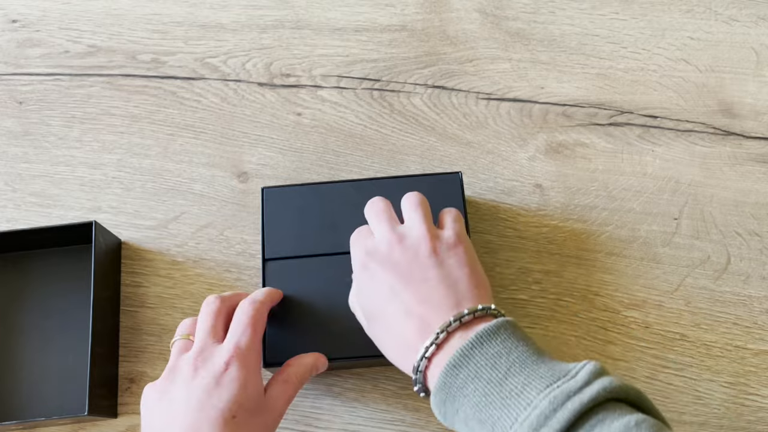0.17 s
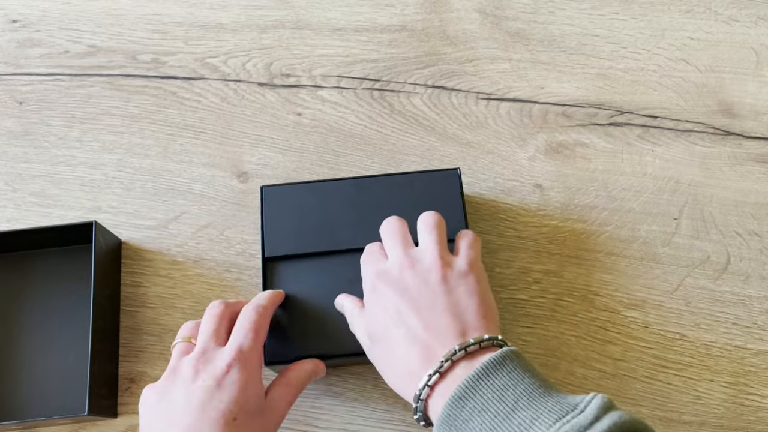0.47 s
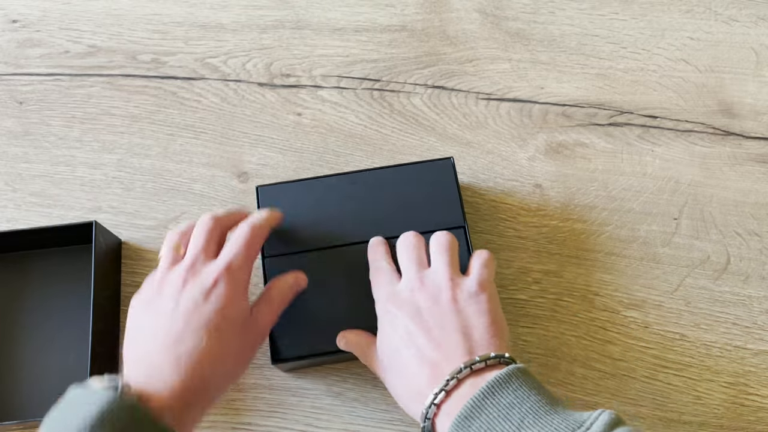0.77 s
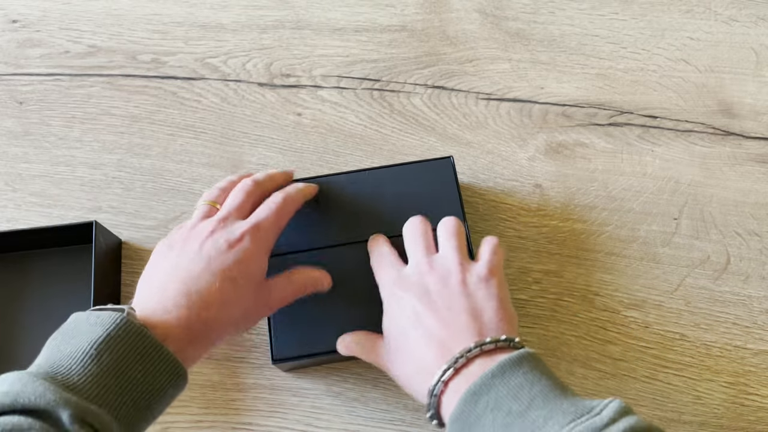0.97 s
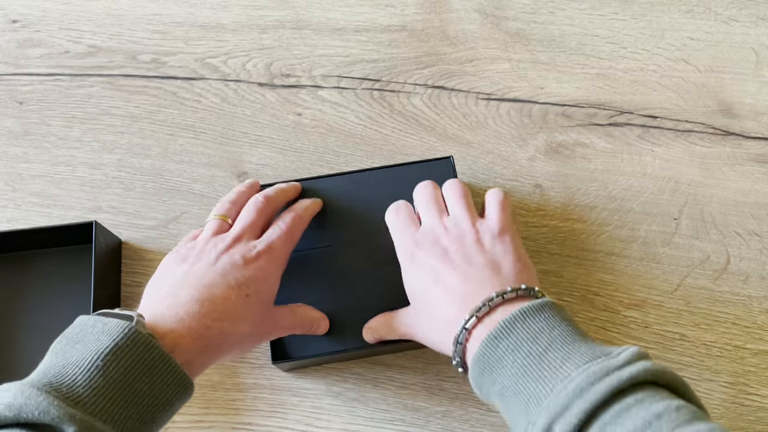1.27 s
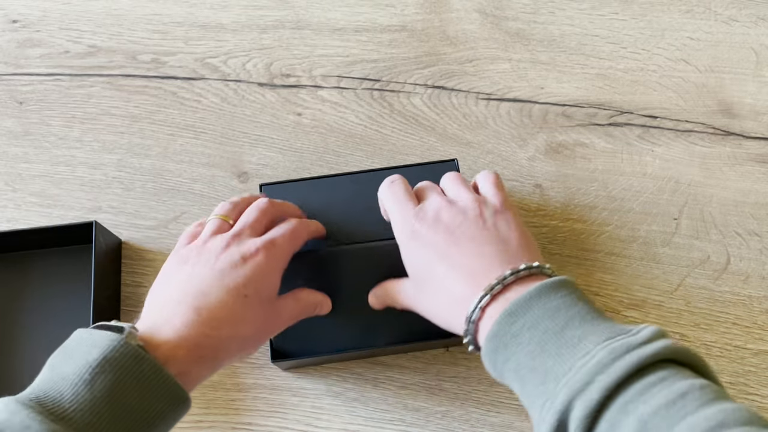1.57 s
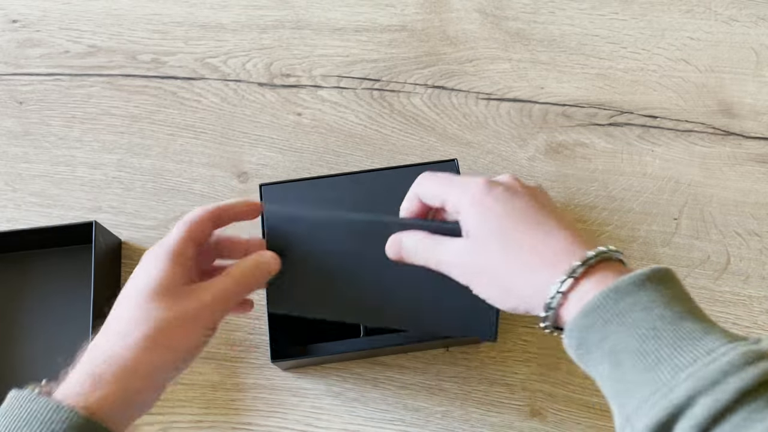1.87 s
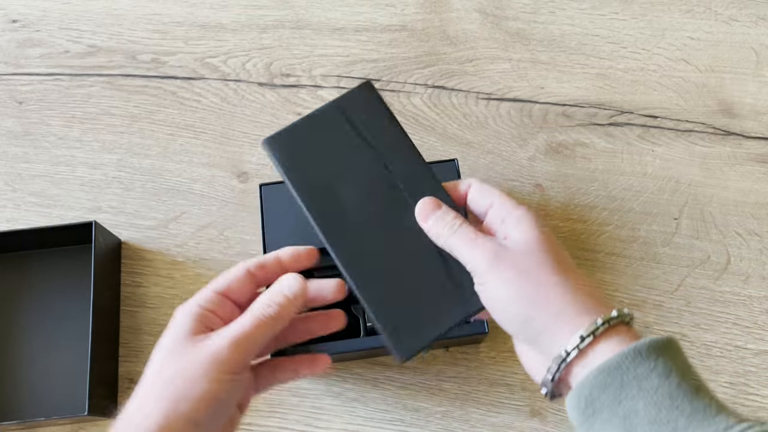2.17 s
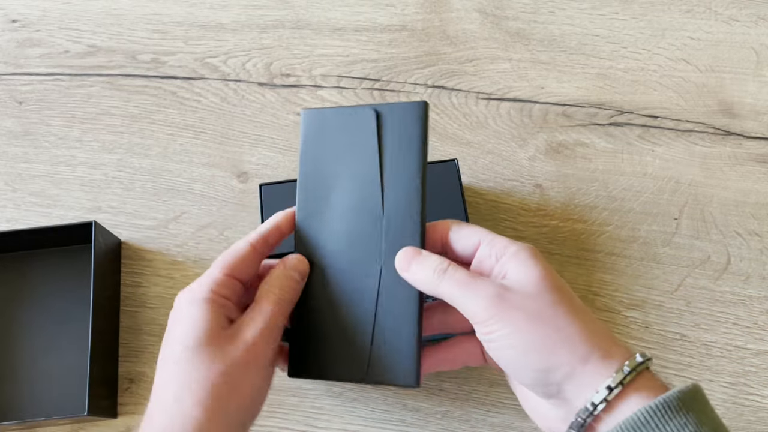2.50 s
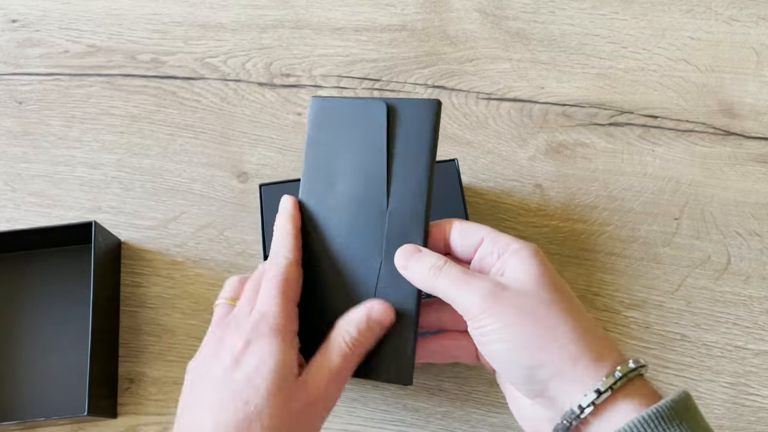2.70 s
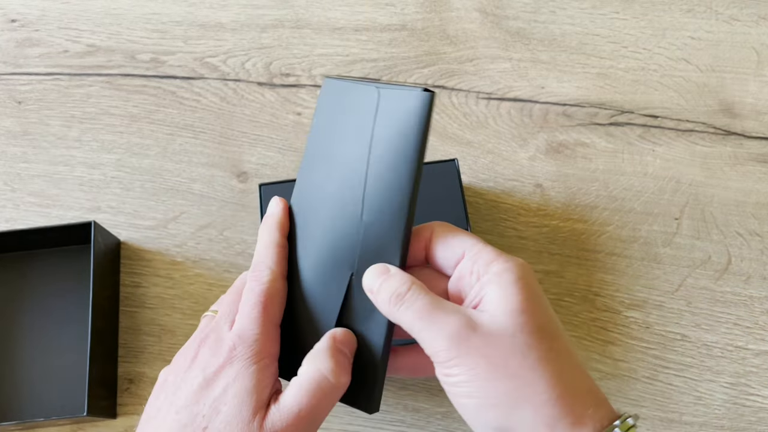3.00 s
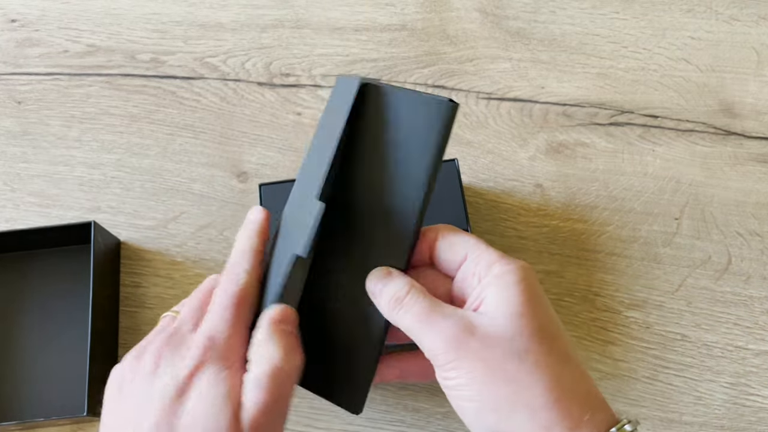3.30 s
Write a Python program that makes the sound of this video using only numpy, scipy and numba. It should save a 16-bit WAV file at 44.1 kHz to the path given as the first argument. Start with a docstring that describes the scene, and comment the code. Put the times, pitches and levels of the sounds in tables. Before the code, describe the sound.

Cardboard rubbing in uneven gritty strokes, clustered knocks around one second, lighter hissy card sliding afterwards, and a bright flap snap last; recorded close from above by a phone in a quiet, faintly humming room.

```python
"""Rubbing leads: two hands slide, tip and lift a folded card insert out of a small cardboard box.
Dense stick-slip grit rings the box, the card and their shifting hollows, and hisses on skin.
Half-sine pushes knock the box, short decaying tones tick the card, and two releases plus a crack snap a flap.
The wooden table rumbles as filtered noise; a quiet room hums with a rough skirt and a short echo.
A phone above hears it all through two ports; the whole sound dips to silence and returns once."""
import sys
import numpy as np
from scipy import signal
from scipy.fft import rfft, irfft, next_fast_len
from scipy.io import wavfile
from scipy.ndimage import uniform_filter1d
from numba import njit

SR = 44100
rng = np.random.default_rng(int(sys.argv[2]) if len(sys.argv) > 2 else 0)


def put_to_file(sound):
    """Save the sound as 16-bit audio at rate SR, in the file named by the first command-line argument."""
    columns = np.atleast_2d(sound).T  # one column per channel
    safe = np.clip(columns, -1, 1)
    whole_steps = np.round(safe * 32767)
    wavfile.write(sys.argv[1], SR, whole_steps.astype(np.int16))


N = 152145
T = np.arange(N) / SR  # time [s]
HALF_FFT = next_fast_len(N // 2 + SR // 4)
F = np.arange(HALF_FFT + 1) * SR / 2 / HALF_FFT  # frequency [Hz]

# Bed of the quiet room: (frequency [Hz], relative density [dB per Hz])
ROOM_COLOUR = [(18, -43), (30, -39), (106, 12.5), (245, 3), (404, 4.5), (461, -44), (740, -54), (822, -41),
               (16000, -64)]
# Hands bearing on the table: (time [s], deep rumble level [dB], low murmur level [dB])
PRESS = [(0.0, -69, -61), (0.14, -88, -63), (0.22, -65, -81), (0.29, -87, -109), (0.4, -74, -58),
         (0.65, -78, -65.5), (0.73, -58, -67.5), (0.85, -80, -61.5), (0.9, -61, -45), (0.92, -56, -48),
         (0.96, -51, -53.5), (1.07, -66, -68), (1.14, -61, -58), (1.175, -53, -53), (1.2, -58, -64),
         (1.255, -67, -43.5), (1.3, -51, -51), (1.42, -61, -67.5), (1.62, -71, -69), (1.78, -68, -64.5),
         (1.98, -89, -74), (2.12, -76, -85), (2.17, -94, -75), (2.32, -64.5, -70), (2.36, -75, -67),
         (2.51, -71, -66.5), (2.555, -69, -67), (2.6, -70, -63), (2.66, -74, -66.5), (2.69, -75, -59.5),
         (2.78, -68, -64.5), (2.9, -72, -78.5), (3.07, -76, -90), (3.12, -82, -79), (3.37, -93, -86),
         (3.45, -56, -38)]
# Table resonances, deep and low: (frequency [Hz], width [Hz], relative level [dB])
TABLE_DEEP = [(43.6, 10, -0.49), (65.3, 26, -1.5)]
TABLE_LOW = [(134, 29, -0.27), (169, 34, 1), (233, 91, -0.97)]
# Ticks of the card: (time [s], level [dB], pitch [Hz])
TICKS = [(0.024, -50, 2500), (0.382, -46.5, 1510), (.695, -51, 1410), (0.8978, -39, 2100),
         (1.032, -45, 2000), (1.126, -39.5, 1250), (1.1298, -39, 2050), (1.167, -44, 1470),
         (1.2353, -38, 2870), (1.3062, -37.5, 2200), (1.311, -45, 1510), (1.5971, -36, 1920),
         (2.042, -52, 1800), (2.23, -44.5, 1720), (2.2473, -49, 1620), (2.2514, -44, 1540),
         (2.374, -46.5, 1780), (2.383, -49, 1900), (2.428, -51, 910), (2.4867, -39.5, 2040),
         (3.2005, -49, 2400), (3.236, -42.5, 2000), (3.332, -38, 3430), (3.361, -44, 1400)]
# Knocks on the box: (time [s], peak level [dB], contact [ms])
KNOCKS = [(.0235, -47, 0.44), (0.078, -50, 1.5), (.402, -41, 1), (.612, -40, 0.93), (0.89, -32.5, 1.06),
          (0.8918, -33.5, 1.4), (0.896, -24, 1.1), (0.8979, -29, 0.95), (1.022, -44, 0.81),
          (1.127, -50, 1.3), (1.136, -37, 1.34), (1.168, -42, 0.6), (1.184, -40, 1.8), (1.2362, -30, 0.65),
          (1.2377, -28, 1.3), (1.2445, -42, 1.3), (1.2568, -27.5, 0.69), (1.578, -47, 0.63),
          (1.5938, -39, 1.1), (1.5961, -44.5, 1.5), (1.6018, -47, 1.6), (1.618, -44, 1.6),
          (3.4265, -25, 2.67)]
# The flap snapping free: (time [s], peak level [dB], contact [ms], held to two samples or more)
SNAP = [(3.4214, -19, .04), (3.4233, -5, 0.14)]
# Rubbing: (time [s], box level [dB], card level [dB], skin hiss level [dB], top treble level [dB])
RUB = [(0.0, -78, -88, -109, -90), (0.01, -70, -88, -92, -111), (0.03, -53.5, -88, -69, -99),
       (0.06, -60.5, -85, -104, -105), (0.09, -61, -70, -69.5, -91), (0.16, -65, -76, -90, -107),
       (0.27, -87.5, -97, -91, -101), (0.37, -68, -97, -100, -100), (0.4, -47.5, -53, -58.5, -70),
       (0.41, -58, -62, -61.5, -79), (0.46, -53.5, -65.5, -83, -80), (0.52, -48, -53, -60, -80),
       (0.55, -50, -54, -60.5, -68), (0.59, -55, -75, -64, -76), (0.62, -47.5, -54, -61.5, -68),
       (0.65, -57, -66, -70.5, -83), (0.72, -60.5, -61.5, -77.5, -80), (0.82, -61.5, -63.5, -68.5, -75),
       (0.84, -54.5, -50, -65, -64), (0.89, -45, -52.5, -54, -57.5), (0.91, -59, -68, -67, -70),
       (0.955, -48.5, -68, -70, -81), (0.98, -46, -60, -61.5, -62.5), (1.02, -57.5, -67, -67.5, -70),
       (1.045, -53.5, -60.5, -70, -74), (1.09, -63.5, -79, -83, -90), (1.13, -55.5, -54.5, -64, -63.5),
       (1.148, -53, -55, -61, -64), (1.172, -56, -48, -69, -64.5), (1.2, -51.5, -55.5, -62, -67),
       (1.23, -54.5, -57, -64.5, -71), (1.24, -34.5, -68, -56, -51), (1.26, -53.5, -60, -62, -77),
       (1.3, -46.5, -53.5, -59, -64), (1.38, -54, -72, -71, -76), (1.41, -54.5, -57, -66, -71),
       (1.44, -55.5, -62.5, -77, -76), (1.49, -60, -58.5, -69, -71.5), (1.55, -66, -64, -70, -74),
       (1.6, -48.5, -47.5, -56.5, -57.5), (1.61, -52, -52.5, -62, -65.5), (1.68, -55, -65.5, -59.5, -60.5),
       (1.79, -60, -57, -62, -64), (1.84, -58, -46.5, -52, -57), (1.88, -56.5, -55.5, -58.5, -63.5),
       (1.99, -78.5, -71.5, -72.5, -78.5), (2.09, -82, -65.5, -64, -68.5), (2.14, -102, -72, -76, -84),
       (2.17, -89, -71.5, -66.5, -79), (2.3, -74, -70.5, -65.5, -78.5), (2.38, -76, -62, -64, -64),
       (2.41, -74, -68, -65, -70), (2.45, -65, -65.5, -57.5, -68), (2.5, -67, -63.5, -62.5, -67.5),
       (2.55, -75, -65.5, -63.5, -68.5), (2.6, -68, -61.5, -59.5, -66.5), (2.66, -68, -63.5, -63, -66.5),
       (2.69, -69, -54.5, -61, -64.5), (2.78, -72, -59, -52, -49), (2.84, -73, -59.5, -55, -55),
       (2.88, -80, -72, -66.5, -74), (2.93, -86, -73, -70.5, -79), (3.04, -93, -72.5, -68, -77),
       (3.09, -99, -76.5, -85, -101), (3.14, -97, -61, -61.5, -72), (3.17, -88, -67.5, -70, -88),
       (3.24, -65.5, -59, -52.5, -61), (3.29, -84, -59.5, -61, -69), (3.37, -60.5, -52, -46, -50.5),
       (3.41, -50.5, -37.5, -36, -44.5), (3.421, -77, -22.5, -38, -56), (3.432, -38, -41, -49, -62),
       (3.45, -46, -30.5, -36, -68)]
# Hollows as the insert tips and lifts: (time [s], hollow of the box [Hz], hollow behind the card [Hz])
HOLLOW = [(0.0, 389, 1770), (0.03, 450, 1870), (0.13, 370, 1570), (0.6, 436, 1430), (0.71, 405, 1530),
          (0.82, 513, 1480), (0.89, 430, 1450), (1.62, 416, 1840), (1.68, 694, 2000), (1.76, 528, 1880),
          (2.14, 353, 2050), (2.2, 331, 1810), (2.25, 587, 1580), (2.3, 338, 2150), (2.49, 400, 2060),
          (2.59, 354, 2170), (2.89, 384, 2390), (3.05, 375, 2320), (3.13, 764, 2530), (3.19, 359, 2470),
          (3.25, 392, 2170), (3.29, 637, 2240), (3.39, 830, 1920), (3.45, 604, 1930)]
# Resonances of the hollow box and the thin card: (frequency [Hz], width [Hz], relative level [dB])
BOX_MODES = [(141, 64, -9), (288, 100, -2), (344.8, 18.5, 5), (396, 24, 8), (492, 10, -1), (592, 24, 3.5),
             (719, 100, -7.5), (827, 10, 4), (975, 680, -15), (1296, 78, -0.5), (2190, 370, -9.5)]
CARD_MODES = [(980, 160, 2), (1400, 128, 3.5), (2145, 130, 7), (2640, 200, -12), (3254, 330, 3),
              (4570, 110, -20), (4930, 230, -3), (5980, 170, -7), (6472, 150, -22), (7430, 250, 10)]
# Broad colours of box, card, skin hiss and top treble: (frequency [Hz], relative density [dB per Hz])
BOX_BROAD = [(200, -21), (300, -0.5), (420, -7), (700, -6.5), (1000, -11.5), (2000, -38.5)]
CARD_BROAD = [(500, -32), (900, -1), (1500, 3.5), (2400, -3), (3500, -7), (5500, -30)]
HISS = [(2500, 2.5), (4000, -1), (6000, -0.5), (8200, 2.5), (9500, -7)]
TOP = [(7500, -62), (9000, 1.5), (11500, -2), (13500, -6.5), (16000, 3)]
# Level between the ports: (frequency [Hz], left over right [dB])
PORT_LEVEL = [(110, 0), (380, 1), (1290, 1.5), (2380, 2.5), (4400, 3.5), (7500, 0), (16000, 0)]
# Phase between the ports: (frequency [Hz], left lead [turns])
PORT_TURNS = [(0, 0), (1800, .03), (2500, .14), (4900, .12), (6460, -.11), (7700, -.5), (8800, -.5),
              (10400, -1), (12900, -1), (13900, -1.5), (16500, -1.5)]
# Reflections that differ between the ports: (frequency [Hz], level against the shared sound [dB])
DIFFUSE = [(60, -16), (300, -9), (700, -4.5), (2000, -7.5), (5000, -1), (7500, -18.5), (9000, -30),
           (16000, -34)]

HUM_HZ, HUM_DB = 100, -66.5  # RMS level, before a slight waver
HUM_SKIRT_HZ, HUM_SKIRT_DB = 35, -71  # width and level of the rough skirt
ROOM_DB = -79
ECHO_DB, ECHO_T60_S = -13, .2
TICK_CYCLES, TICK_RISE_S = 1.3, 0.00021  # time constants of the fade and the rise
TICK_CRACK_DB = -6  # noise against tone, before the noise gets its extra fade
KNOCK_TAIL_DB = -24  # rattle against the knock's peak, before its rise and fade
KNOCK_TAIL_RISE_S, KNOCK_TAIL_S = 0.0062, 0.019
SNAP_TAIL_DB, SNAP_TAIL_S = -14.5, 0.0024  # hiss part of the crack, before its fade
BOX_RING_DB, CARD_RING_DB = 1, -7  # resonances against the broad colour while rubbed
LARGEST_SLIP = 2.5  # in mean slips
SCATTER_S = 0.016  # fade of the differing reflections
DIP_S, DIP_FALL_S, DIP_RISE_S = 3.106, .018, .014
TOP_HZ = 16300


def undb(db):
    """Turn decibels into gain."""
    return 10 ** (np.asarray(db) / 20)


def unit(x):
    """Bring a sound to an RMS of one."""
    return x / np.sqrt(np.mean(x ** 2))


def peak(x, db):
    """Scale by the peak the sound has, to give it a chosen peak level."""
    return x * undb(db) / np.abs(x).max()


def over_hz(rows):
    """Spread (frequency, value) rows over every frequency, on a log axis."""
    hz, value = np.array(rows, float).T
    return np.interp(np.log(F + 1), np.log(hz + 1), value, left=value[0], right=value[-1])


def through(x, response):
    """Apply a frequency response, with room for tails."""
    return irfft(rfft(x, 2 * HALF_FFT) * response)[..., :N]


def colour(x, rows):
    """Filter by a dB spectrum, silent outside it."""
    inside = (F > rows[0][0]) * (F < rows[-1][0])
    return through(x, undb(over_hz(rows)) * inside)


def ring(x, modes, sign=-1):
    """Sum causal resonances; sign -1 alternates their polarity."""
    response = 0
    for k, (hz, width, db) in enumerate(modes):
        mode = 1j * F * width / (hz ** 2 - F ** 2 + 1j * F * width)
        response = response + sign ** k * undb(db) * mode
    return through(x, response)


@njit
def sweep(x, hz, share):
    """Band-pass with a moving centre, its width a share of that centre."""
    y, band, low = np.empty(len(x)), 0., 0.
    for i in range(len(x)):
        g = np.tan(np.pi * hz[i] / SR)
        v = (band + g * (x[i] - low)) / (1 + g * (g + share))
        band, low, y[i] = 2 * v - band, low + 2 * g * v, v
    return y


def walk(rate):
    """Slewed random levels with a spread near 1, drawn anew rate times a second."""
    k = int(SR / rate)
    steps = np.repeat(rng.standard_normal(N // k + 1), k)
    return 1.1 * uniform_filter1d(uniform_filter1d(steps, k), k)[:N]


def grit(scatter_db, patchy_db):
    """Stick-slip friction: dense slips of uneven size that come in patches."""
    size = np.minimum(rng.exponential(size=N), LARGEST_SLIP)
    return rng.standard_normal(N) * undb(scatter_db * size + patchy_db * walk(60))


def push(t, ms):
    """One contact, a half-sine of force at least two samples long."""
    x = (T - t) / max(ms / 1000, 2 / SR)
    return np.where((x > 0) & (x < 1), np.sin(np.pi * x), 0)


def room():
    """Mains hum, wavering in level and phase, with a rough skirt over the quiet of the room."""
    level = np.sqrt(2) * undb(HUM_DB + 0.79 * walk(36))
    hum = level * np.sin(2 * np.pi * HUM_HZ * T + 0.77 * walk(9))
    skirt = unit(ring(rng.standard_normal(N), [(HUM_HZ, HUM_SKIRT_HZ, 0)]))
    bed = unit(colour(rng.standard_normal(N), ROOM_COLOUR))
    return hum + undb(HUM_SKIRT_DB) * skirt + undb(ROOM_DB) * bed


def room_echo(near):
    """Reflections as a noise tail of unit energy that dies away exponentially."""
    tail = unit(rng.standard_normal(N) * undb(-60 * T / ECHO_T60_S)) / np.sqrt(N)
    return undb(ECHO_DB) * signal.fftconvolve(near, tail)[:N]


def table():
    """The table top resonates under the hands: noise rumbles deep, grit murmurs low."""
    t, deep_db, low_db = np.array(PRESS).T
    deep = unit(ring(rng.standard_normal(N), TABLE_DEEP))
    low = unit(ring(grit(scatter_db=1.5, patchy_db=-1.0), TABLE_LOW))
    return undb(np.interp(T, t, deep_db)) * deep + undb(np.interp(T, t, low_db)) * low


def ticks():
    """Each tick is a noisy crack and a few decaying cycles of the card."""
    out = np.zeros(N)
    u = np.arange(SR // 50) / SR
    for t, db, hz in TICKS:
        noise = rng.standard_normal(len(u))
        fade = (1 - np.exp(-u / TICK_RISE_S)) * np.exp(-u * hz / TICK_CYCLES)
        tone = np.sin(2 * np.pi * hz * u)
        crack = undb(TICK_CRACK_DB) * noise * fade
        i = int(t * SR)
        out[i:i + len(u)] += undb(db) * fade / fade.max() * (tone + crack)
    return out


def knocks():
    """Soft blows ring the box modes in one polarity; its loose walls rattle on."""
    blows, tail = np.zeros(N), np.zeros(N)
    for t, db, ms in KNOCKS:
        blows += peak(ring(push(t, ms), BOX_MODES, sign=1.0), db)
        rise = np.clip((T - t) / KNOCK_TAIL_RISE_S, 0, 1)
        tail += undb(db + KNOCK_TAIL_DB) * rise * np.exp(-np.abs(T - t) / KNOCK_TAIL_S)
    rattle = unit(ring(grit(scatter_db=8.5, patchy_db=-1.0), BOX_MODES))
    return blows + tail * rattle


def snap():
    """Two quick releases ring the card, with a bright noise crack from the first one on."""
    start, noise = SNAP[0][0], rng.standard_normal(N)
    fade = (T > start) * np.exp(-np.abs(T - start) / SNAP_TAIL_S)
    crack = fade * (unit(colour(noise, HISS)) + 0.52 * unit(colour(noise, TOP)))
    releases = sum(peak(ring(push(t, ms), CARD_MODES), db) for t, db, ms in SNAP)
    return releases + undb(SNAP_TAIL_DB) * crack


def hollow(x, t, hz, db, share):
    """An air hollow: two passes of a band-pass that follows its changing pitch."""
    centre = np.interp(T, t, hz)
    return undb(db) * unit(sweep(sweep(x, centre, share), centre, share))


def rubbing():
    """Grit rings the box, the card and their hollows, and hisses under the fingers."""
    t, box_db, card_db, hiss_db, top_db = np.array(RUB).T
    when, box_hz, card_hz = np.array(HOLLOW, float).T

    box_grit = grit(scatter_db=6.0, patchy_db=2.5)
    box = unit(colour(box_grit, BOX_BROAD))
    box += undb(BOX_RING_DB) * unit(ring(box_grit, BOX_MODES))
    box += hollow(box_grit, when, box_hz, db=-1, share=.55)

    card_grit = grit(scatter_db=4.5, patchy_db=3.0)
    card = unit(colour(card_grit, CARD_BROAD))
    card += undb(CARD_RING_DB) * unit(ring(card_grit, CARD_MODES))
    card += hollow(card_grit, when, card_hz, db=-4, share=.45)

    skin_grit = grit(scatter_db=6.0, patchy_db=2.0)
    hiss, top = colour(skin_grit, HISS), colour(skin_grit, TOP)
    layers = [(box, box_db), (card, card_db), (hiss, hiss_db), (top, top_db)]
    return sum(undb(np.interp(T, t, db)) * unit(layer) for layer, db in layers)


def ports(x):
    """Both ports hear the sound with their own phase and level, plus reflections that differ."""
    # Each port takes half the level and phase difference, in opposite directions
    turn = undb(over_hz(PORT_LEVEL) / 2) * np.exp(1j * np.pi * over_hz(PORT_TURNS))
    scatter = rfft(rng.standard_normal(N) * np.exp(-T / SCATTER_S), 2 * HALF_FFT)
    side = undb(over_hz(DIFFUSE)) * scatter / np.sqrt(np.mean(np.abs(scatter) ** 2))
    return through(x, np.array([(1 + side) * turn, (1 - side) / turn]))


def dip():
    """One straight fade of the whole sound to silence and back."""
    return np.clip(np.maximum((DIP_S - T) / DIP_FALL_S, (T - DIP_S) / DIP_RISE_S), 0, 1)


def scene():
    """Handling sounds and their echo over table and room, heard at two ports."""
    near = rubbing() + knocks() + ticks() + snap()
    return ports(near + room_echo(near) + table() + room()) * dip()


def record(dry):
    """The phone cuts the top with a steep elliptic low-pass."""
    return signal.sosfilt(signal.ellip(8, .2, 70, TOP_HZ, fs=SR, output="sos"), dry)


dry = scene()
out = record(dry)
put_to_file(out)
```